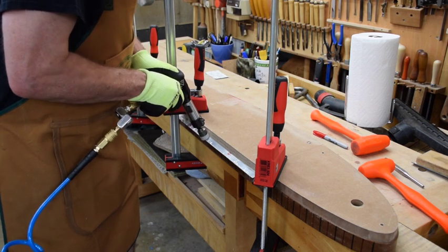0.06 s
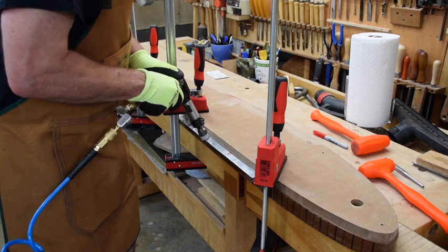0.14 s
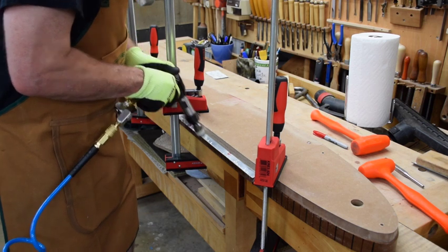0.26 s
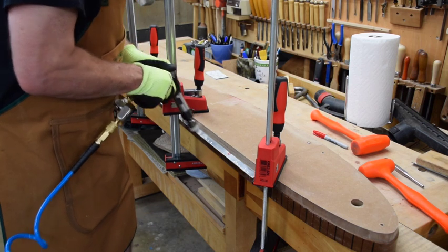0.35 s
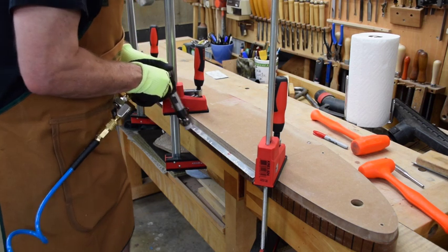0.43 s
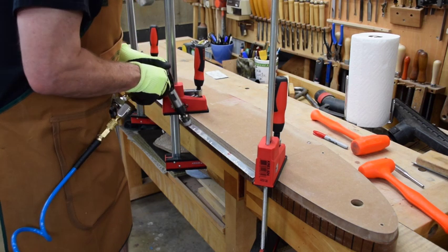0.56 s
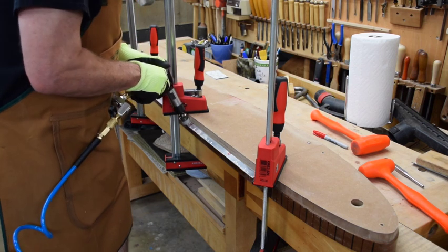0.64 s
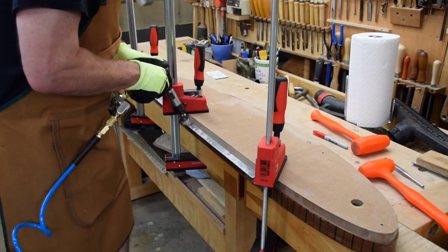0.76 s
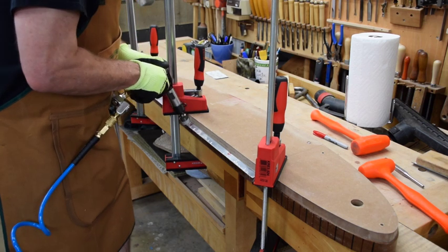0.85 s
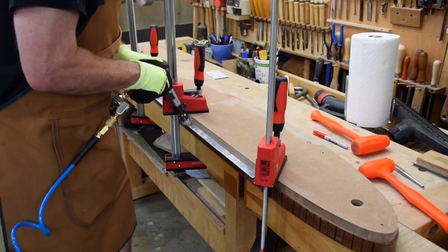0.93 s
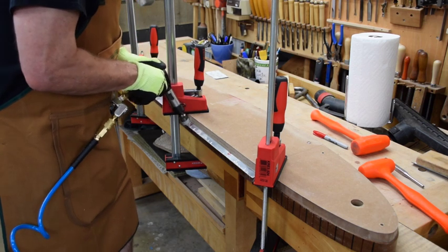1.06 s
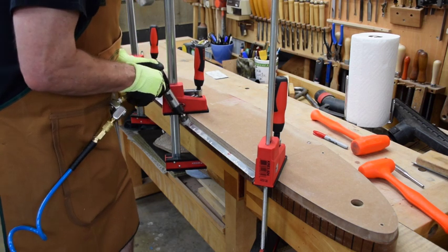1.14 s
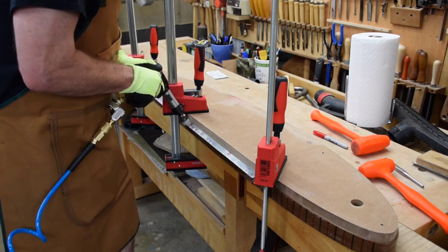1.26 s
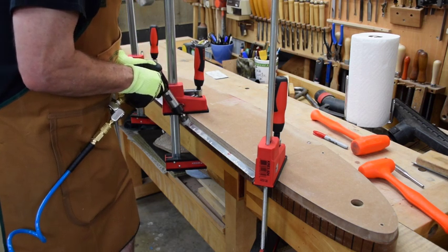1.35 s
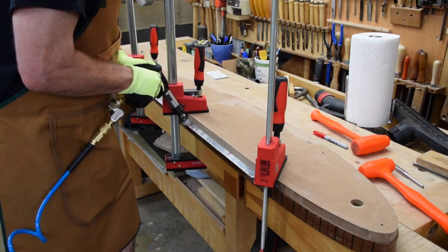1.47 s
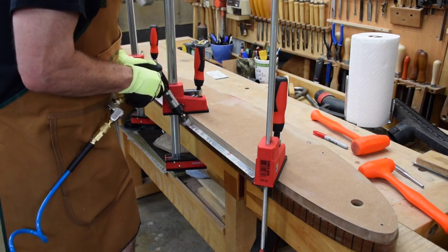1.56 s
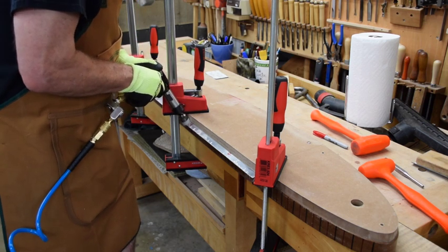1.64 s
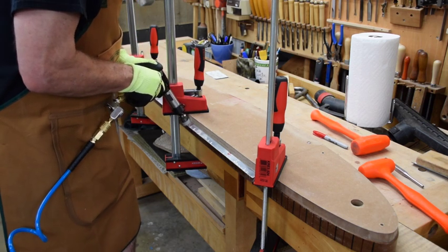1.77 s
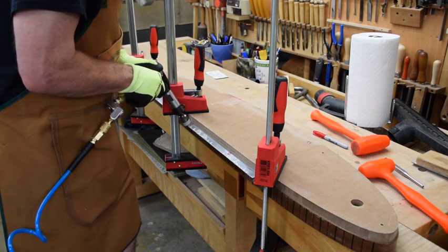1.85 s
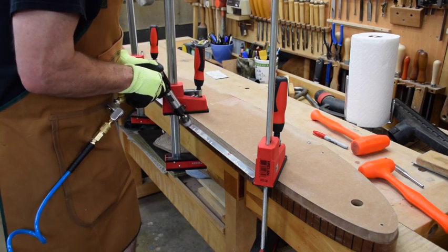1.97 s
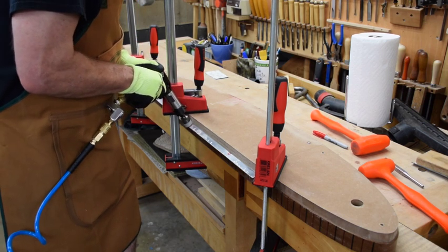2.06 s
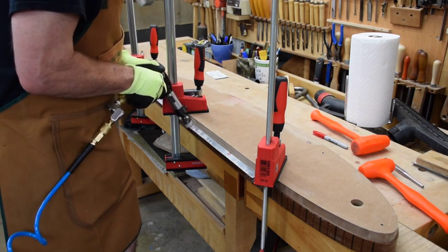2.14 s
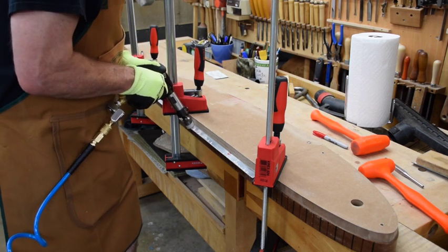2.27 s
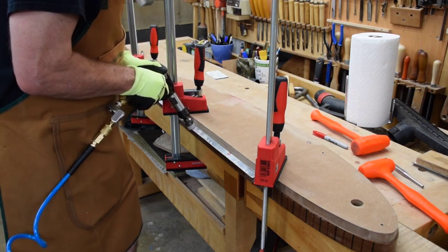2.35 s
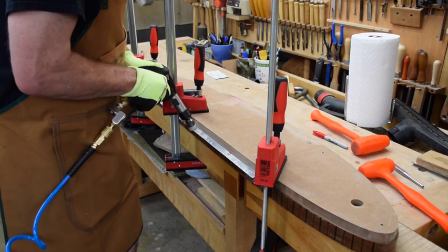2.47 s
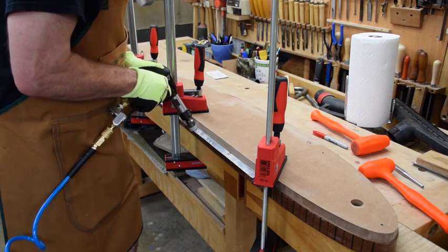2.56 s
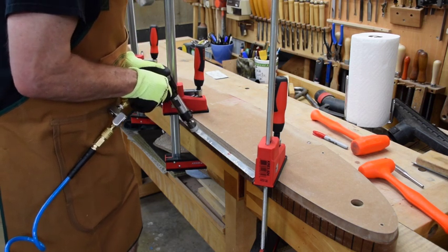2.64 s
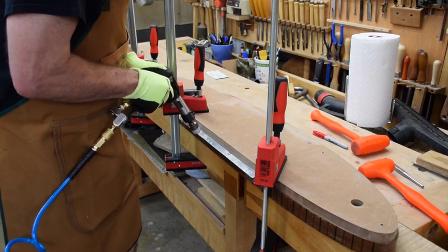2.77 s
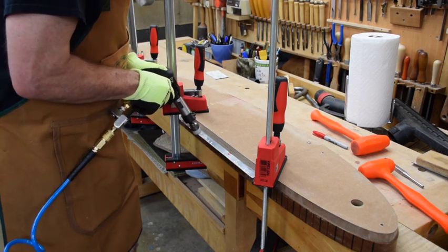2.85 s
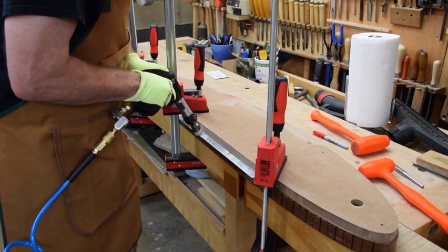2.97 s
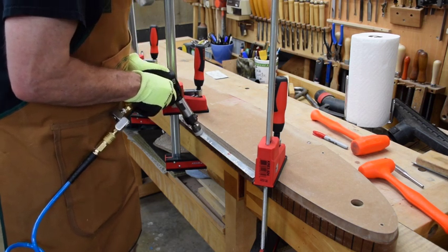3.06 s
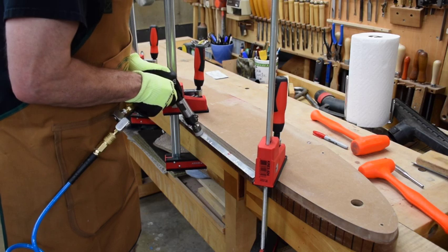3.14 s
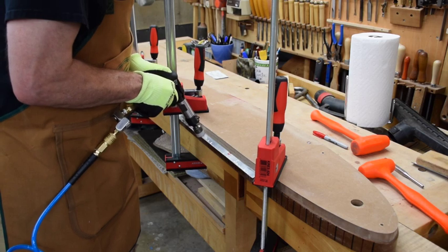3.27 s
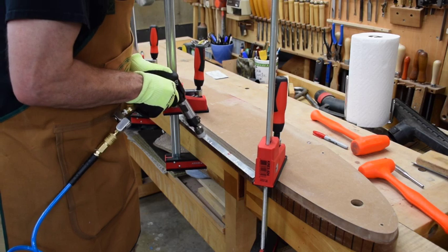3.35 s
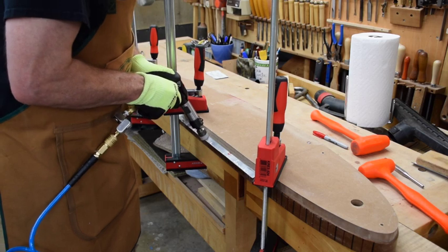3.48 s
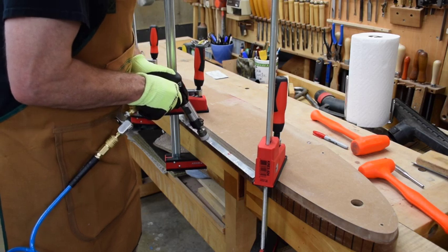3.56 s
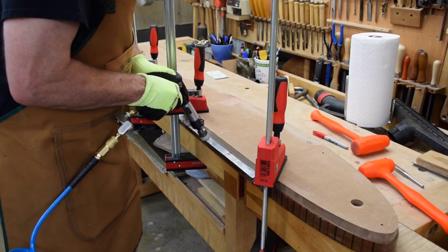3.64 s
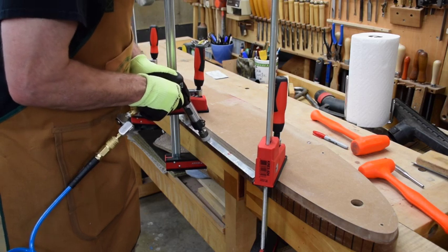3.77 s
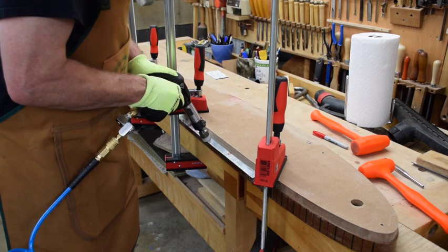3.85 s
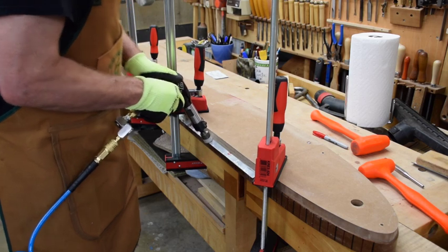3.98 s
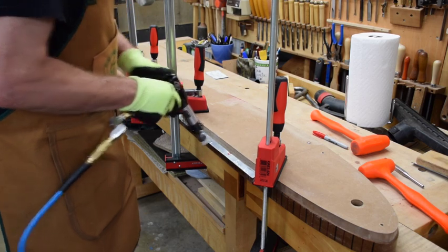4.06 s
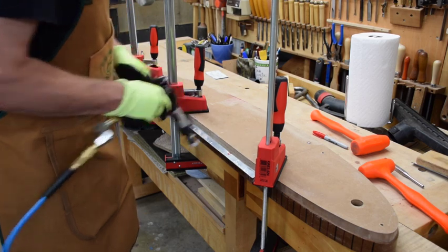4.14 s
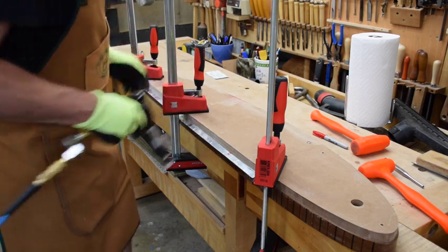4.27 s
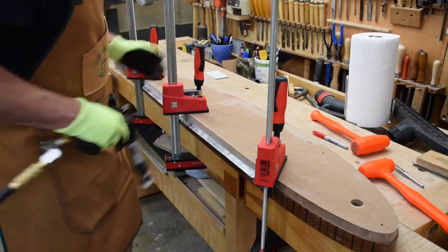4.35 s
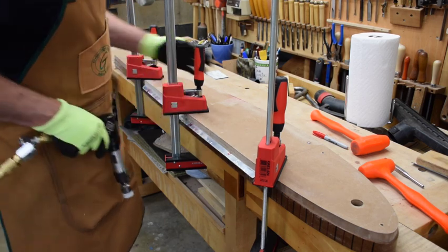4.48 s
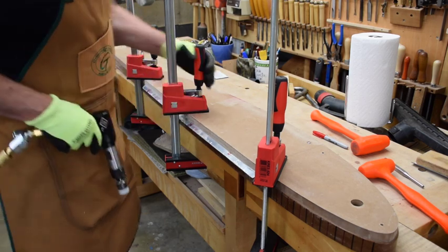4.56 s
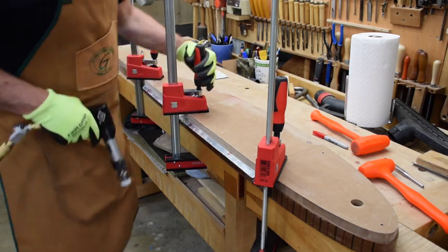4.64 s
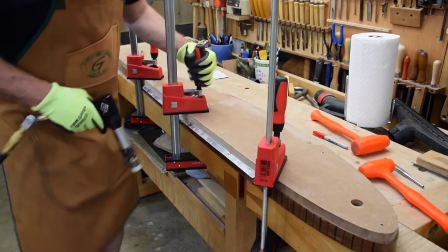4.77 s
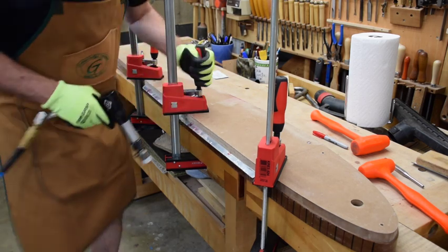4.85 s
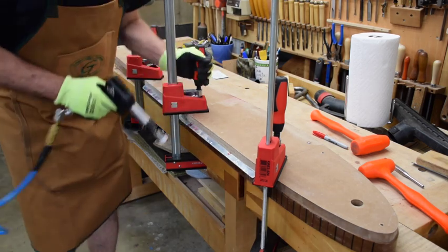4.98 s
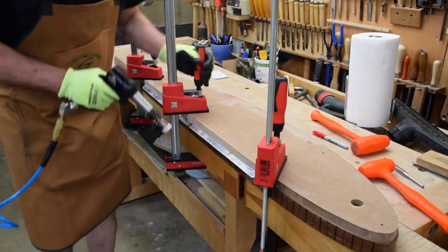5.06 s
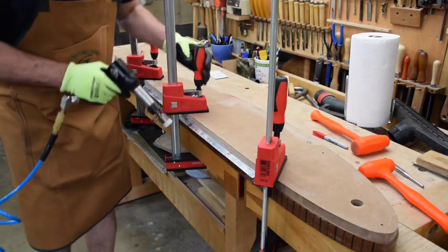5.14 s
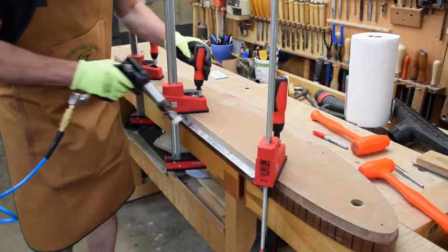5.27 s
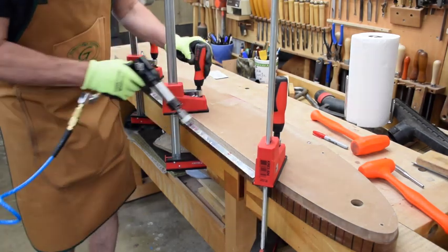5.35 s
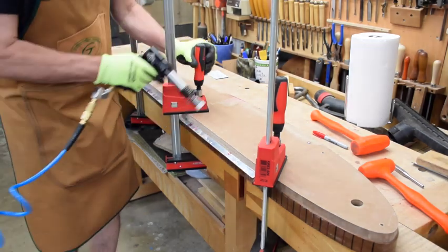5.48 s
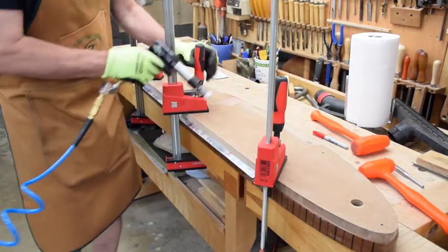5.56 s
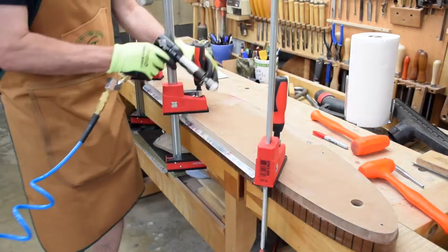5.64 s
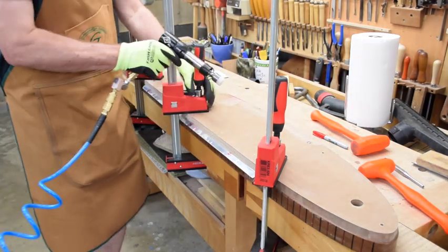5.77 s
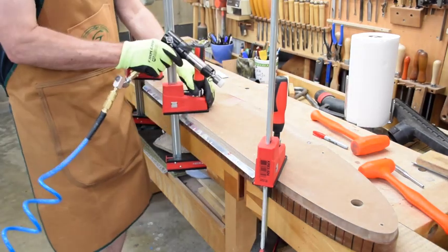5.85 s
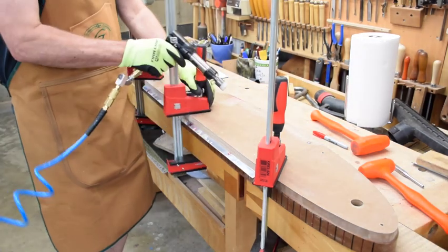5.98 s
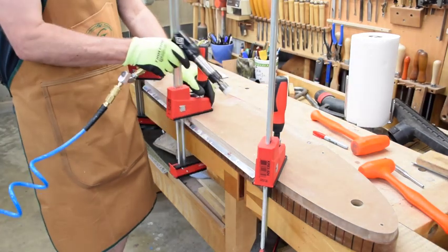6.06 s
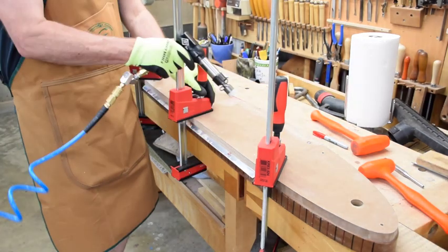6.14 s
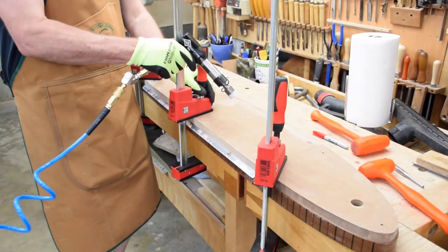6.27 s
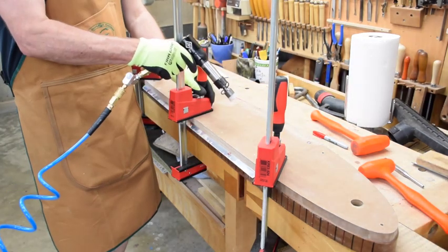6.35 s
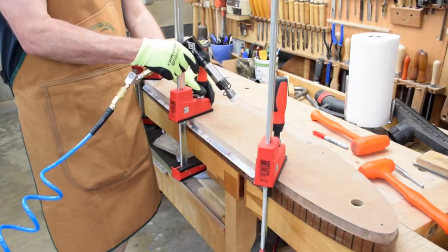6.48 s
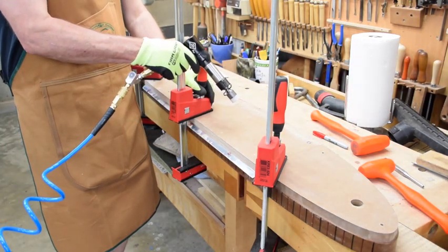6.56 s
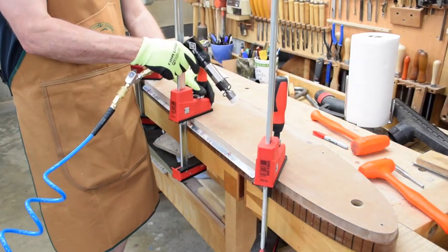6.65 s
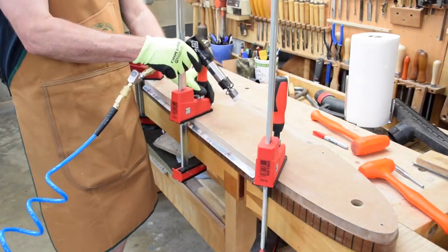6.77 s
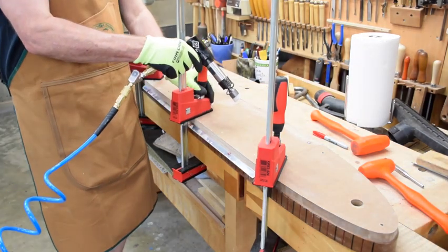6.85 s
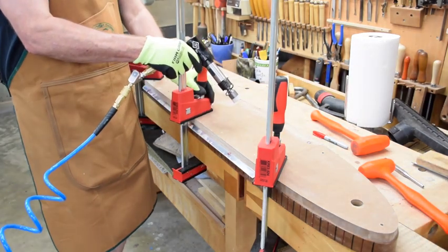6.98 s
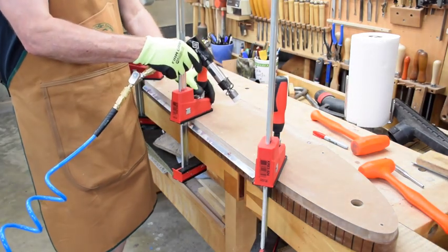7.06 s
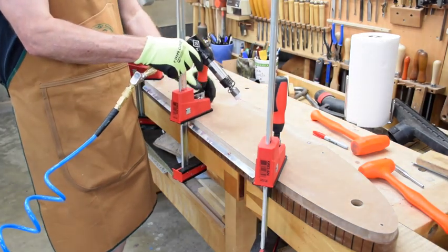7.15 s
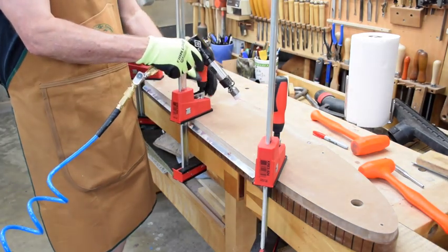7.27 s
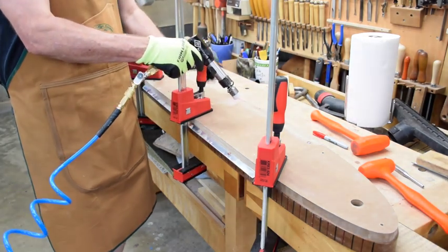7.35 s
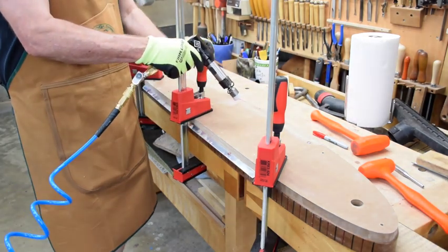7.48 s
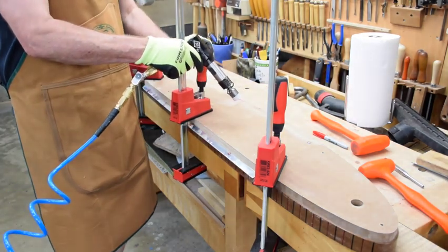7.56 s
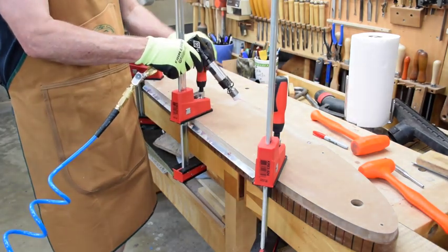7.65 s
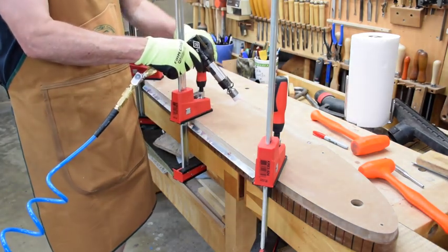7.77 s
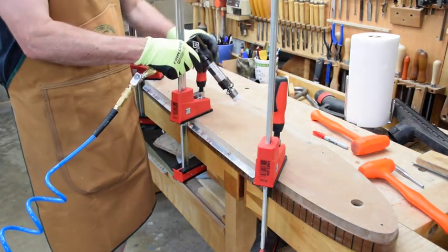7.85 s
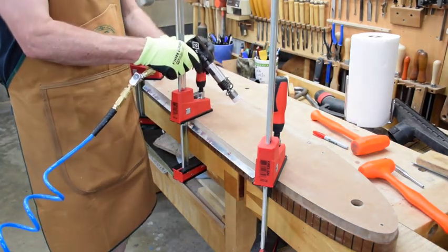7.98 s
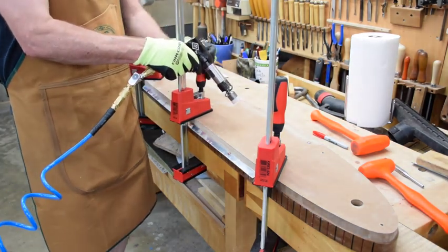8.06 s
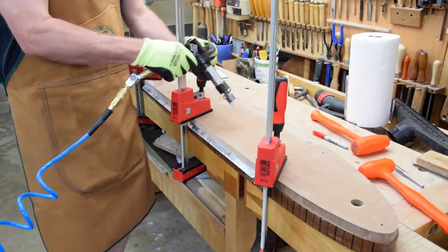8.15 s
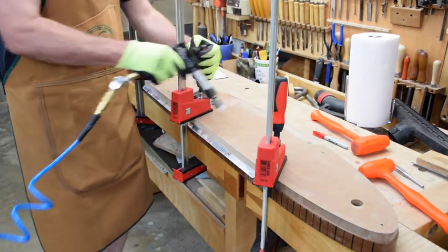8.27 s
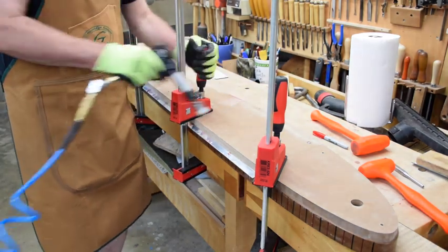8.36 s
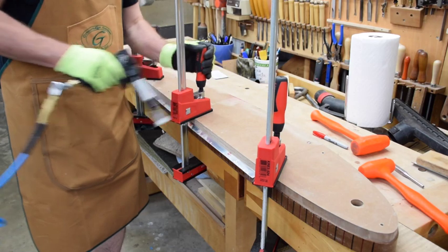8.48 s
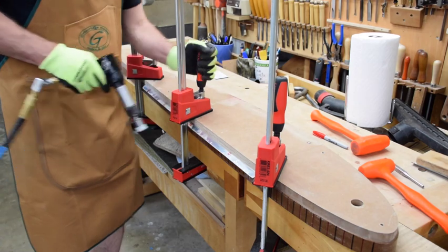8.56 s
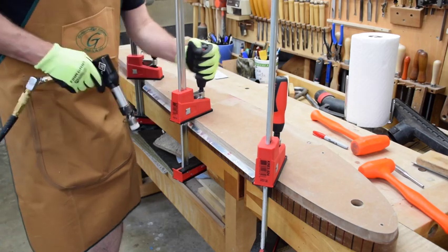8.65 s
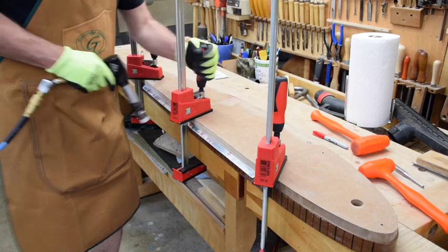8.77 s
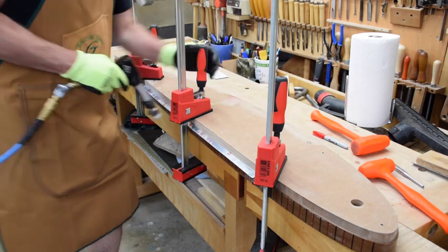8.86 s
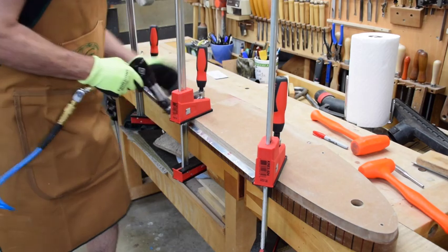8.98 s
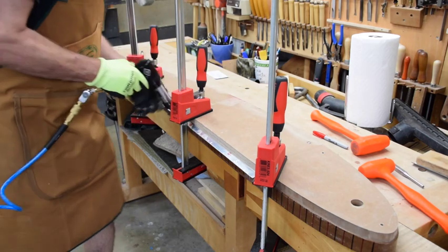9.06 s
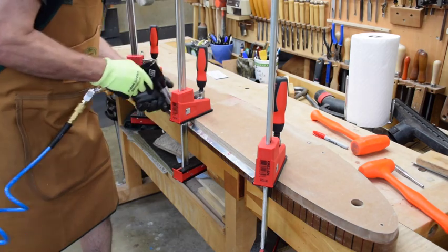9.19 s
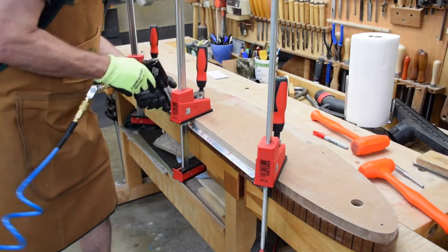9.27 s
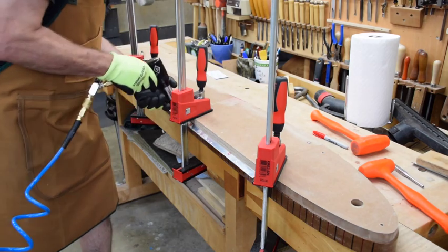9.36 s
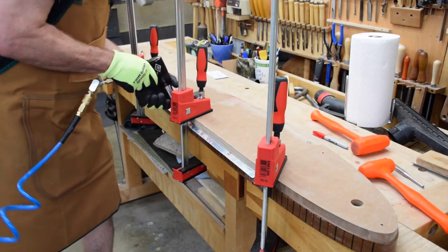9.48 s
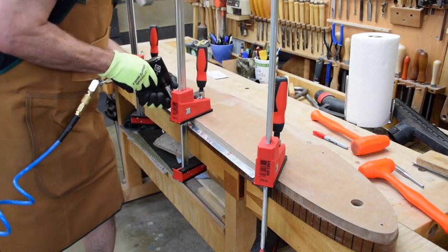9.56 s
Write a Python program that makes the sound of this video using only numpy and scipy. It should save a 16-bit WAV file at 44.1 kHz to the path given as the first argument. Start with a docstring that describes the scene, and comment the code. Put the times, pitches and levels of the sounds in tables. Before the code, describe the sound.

Rapid, very loud air-hammer blows ring an aluminium strip on a wooden form, hiss and stop; clamps then knock and gloves rub quietly.

```python
"""An air hammer beats an aluminium strip over a wooden form clamped to a workbench, about 28 blows a second.
One burst ends and a long, very loud one follows. Each blow rings strip, tool and bench, and puffs out air.
Around the bursts, clamps and tool knock and clink, and gloves, apron and hose rub: shaped clicks and noise.
All of it sounds in a small, live workshop made of echoes and a short tail, over a quiet ventilation hum."""
import sys
import numpy as np
from scipy import signal
from scipy.fft import rfft, irfft
from scipy.io import wavfile
from scipy.ndimage import uniform_filter1d

SR = 44100
rng = np.random.default_rng(int(sys.argv[2]) if len(sys.argv) > 2 else 0)


def store_wav(level_fs):
    """Save 16-bit WAV to argv[1]."""
    pcm = np.round(np.clip(np.atleast_2d(level_fs), -1, 1) * 32767)
    wavfile.write(sys.argv[1], SR, pcm.T.astype(np.int16))


N = 424237
SIZE = 32768  # length of every impulse response, in samples
HZ = np.fft.rfftfreq(SIZE, 1 / SR)  # pitch of each spectrum bin
AGE = np.arange(SIZE) / SR  # seconds since a sound began
TIME = np.arange(N) / SR  # seconds since the scene began


def amp(db):
    """Turns decibels into a gain."""
    return 10 ** (np.asarray(db) / 20)


def unit(x):
    """Scales a sound so that its squares sum to 1."""
    return x / np.sqrt(np.sum(x ** 2) + 1e-20)


def read(points, hz=HZ):
    """Reads a spectrum table, with straight lines between its points on a log-frequency axis."""
    f, value = np.transpose(points)
    return np.interp(np.log(hz + 1), np.log(f), value)


def follow(rows, t):
    """Reads each column of a time table at the times t, with straight lines between its rows."""
    s, *columns = np.transpose(rows)
    return [np.interp(t, s, column) for column in columns]


def fade(t60):
    """An exponential decay that falls by 60 dB in t60 seconds."""
    return np.exp(-np.minimum(np.log(1000) * AGE / t60, 20))


def ring(hz, t60):
    """A decaying sine: one struck resonance."""
    return unit(np.sin(2 * np.pi * hz * AGE) * fade(t60))


def bump(hz, width_hz):
    """The bell shape of one resonance in a spectrum."""
    return 1 / (1 + (2 * (HZ - hz) / width_hz) ** 2)


def causal(db):
    """Makes the promptest (minimum-phase) impulse response that has this spectrum."""
    cepstrum = irfft(np.log(amp(np.maximum(db, db.max() - 100))))
    # Folding the second half onto the first leaves nothing before time zero.
    cepstrum[1:SIZE // 2] *= 2
    cepstrum[SIZE // 2 + 1:] = 0
    return irfft(np.exp(rfft(cepstrum)))


def through(x, response):
    """Passes x through an impulse response (convolution), cut to the length of x."""
    full = signal.oaconvolve(np.atleast_2d(x), np.atleast_2d(response), axes=1)
    return full[:, :np.shape(x)[-1]].squeeze()


def add(mix, s, sound):
    """Mixes a sound in at time s."""
    part = mix[max(round(s * SR), 0):][:len(sound)]
    part += sound[:len(part)]


def evened(h, size):
    """Keeps a response's smear in time but levels its colour, averaged over size bins."""
    colour_db = 10 * np.log10(uniform_filter1d(abs(rfft(h)) ** 2, size=size))
    return unit(through(h, causal(-colour_db)))


def puffs(train, envelope):
    """Gives the loudness of a puff of this shape after every click of the train."""
    return np.sqrt(abs(through(train ** 2, unit(envelope) ** 2)))


def path(near_db, near_t60, tail_db):
    """Direct sound, echoes off bench and wall, scatter from the clutter, and the room's tail."""
    # Nearby surfaces: delay_s, gain, cutoff_hz (the treble above it is dulled)
    echoes = [(.0043, 0.22, 9000), (.0054, 0.34, 4000), (.0075, 0.3, 6000), (.0094, 0.26, 8020),
              (.012, 0.65, 1300), (0.0158, 0.25, 2000)]
    # How long the room rings: pitch_hz, t60_s
    room = [(150, 0.98), (400, 0.97), (1040, 0.65), (2760, .6), (7280, 0.53), (14000, 0.44)]
    early = np.zeros(SIZE)
    early[0] = 1
    for s, gain, cut_hz in echoes:
        smear = fade(np.log(1000) / (2 * np.pi * cut_hz))
        add(early, s, gain * smear / smear.sum())
    scatter = unit(rng.standard_normal(SIZE) * fade(near_t60) * (AGE > .004))
    # The tail is noise in which each pitch dies away at its own rate.
    hz, t, z = signal.stft(rng.standard_normal(SIZE) * (AGE > .012), SR, nperseg=256)
    decay = np.exp(-np.log(1000) * t / read(room, hz)[:, None])
    tail = signal.istft(z * decay, SR, nperseg=256)[1][:SIZE]
    return evened(early + amp(near_db) * scatter + amp(tail_db) * unit(tail), size=31)


def shop(near_db, near_t60, tail_db, width_db):
    """Left and right responses: most alike around 1 kHz, wider in the bass and widest in the treble."""
    # Side (left-right difference) against mid, before width_db is added: pitch_hz, level_db
    width = [(100, -14.5), (700, -23), (1300, -32), (2400, -22.5), (4400, -16), (8100, -9.5), (15000, 1.5)]
    mid = path(near_db, near_t60, tail_db)
    side = path(near_db + 23.0, near_t60, tail_db + 15.0)
    side = through(side, causal(read(width) + width_db))
    return np.array([mid + side, mid - side])


def background():
    """Steady shop ventilation, made of coloured noise, with a few faint wavering tones."""
    # Colour of the ventilation: pitch_hz, level_db (relative)
    hum = [(18, -48), (30, -29), (64, -15.5), (190, -12.5), (211, -11), (288, -9), (415, -8.5), (448, -7.5),
           (815, -5), (928, -6.5), (1000, -7), (2560, -13), (2990, -17.5), (3410, -19), (15000, -36.5)]
    # Side against mid: pitch_hz, level_db
    hum_width = [(60, -15.5), (180, -13.5), (550, -11.5), (1650, -8.5), (3500, -2.5), (15000, -2)]
    # Faint tones: pitch_hz, level_db (rms)
    hum_lines = [(414.5, -71.5), (710.6, -71.5), (947.5, -68), (1066, -68.5)]
    hum_db = -55  # rms of the mid noise
    mid, side = through(rng.standard_normal((2, N)), unit(causal(read(hum))))
    side = through(side, causal(read(hum_width)))
    air = amp(hum_db) * np.array([mid + side, mid - side])
    for hz, db in hum_lines:
        waver_hz = 200 * uniform_filter1d(rng.standard_normal(N), size=4000)  # averages to a few Hz
        air += amp(db) * np.sqrt(2) * np.sin(2 * np.pi * np.cumsum(hz + waver_hz) / SR)
    return air


def rubs(grain=1.0):
    """Gloves, hose and clamp bars slide: many tiny random slips under the swell of each stroke."""
    # Strokes: start_s, length_s, level_db (before the room), centre_hz, width_octaves
    strokes = [(4.332, 0.067, -54, 1500, 1.1), (4.454, 0.083, -42.5, 1390, 1.17),
               (4.555, 0.088, -59.5, 8870, 2.5), (4.827, 0.12, -41, 1084, 1.03),
               (4.908, 0.14, -31, 1210, 1.02), (4.92, 0.35, -64, 6000, 1.1),
               (5.437, 0.057, -48, 2020, 0.43), (5.499, 0.058, -46, 354, 0.63),
               (5.957, 0.22, -49, 780, 1.4), (6.04, 0.11, -63.5, 7960, 0.85), (6.29, 0.14, -57, 354, 0.6),
               (8.66, 0.064, -43, 1000, 0.41), (8.751, 0.34, -62, 5060, 1.9), (8.801, 0.25, -54, 970, 1.15),
               (9.585, 0.045, -50.5, 1960, .05)]
    out = np.zeros(N)
    softness_db = read([(80, -20), (250, 7.5), (10500, -2.0), (15500, -15)])
    for s, length, db, hz, octaves in strokes:
        slips = rng.standard_normal(SIZE) * np.exp(grain * rng.standard_normal(SIZE))
        away = np.log2((HZ + 1) / hz) / octaves
        colour = causal(softness_db - 20 * np.log10(1 + away ** 2 + away ** 4 / 8))
        n = min(round(length * SR), SIZE)
        stroke = through(slips, colour)[:n] * signal.windows.tukey(n, .7)
        add(out, s, amp(db) * np.sqrt(n) * unit(stroke))
    return out


def clinks(level_db=1, rattle_t60=0.007, low_db=11, low_width_hz=500, high_db=17, high_width_hz=1100):
    """Small steel parts clink: a sharp tick of noise through two short steel resonances."""
    # Clinks: start_s, level_db (before level_db above), lower_ring_hz, upper_ring_hz
    clink_list = [(0.474, -46, 4200, 7300), (0.5916, -36.5, 3120, 7640), (9.257, -42.5, 4400, 7000),
                  (9.3591, -44, 4400, 7550)]
    out = np.zeros(N)
    colour_db = read([(200, -24.5), (1500, 8.5), (2400, 1.5), (8200, -4.0), (11000, -12.5), (15000, -25.0)])
    for s, db, low_hz, high_hz in clink_list:
        rings_db = low_db * bump(low_hz, low_width_hz) + high_db * bump(high_hz, high_width_hz)
        tick = rng.standard_normal(SIZE) * fade(rattle_t60)
        add(out, s, amp(db) * unit(through(tick, causal(colour_db + rings_db))))
    return amp(level_db) * np.sqrt(.04 * SR) * out  # levels count as an average over 40 ms


def knocks(ring_width_hz=70, chatter_db=5, chatter_t60=0.04, count=4):
    """A contact and its chatter ring clamp and wood at a few places: duller if soft, deeper if heavy."""
    # Clamps and tool on wood: start_s, level_db, treble_cutoff_hz, thud_db,
    # lower_ring_hz, lower_ring_db, upper_ring_hz, upper_ring_db
    knock_list = [(0.684, -32.5, 520, -1, 390, 10, 890, 2), (0.814, -42, 790, -18, 824, 11, 1720, 18),
                  (0.861, -40, 1490, -7, 800, -1, 1180, 2), (1.02, -41, 6000, 17, 230, 9, 1400, 0),
                  (4.306, -43, 2980, 1, 696, 8, 1610, 2), (4.34, -40.5, 2880, -3.5, 990, 2, 2000, 7),
                  (4.626, -36, 3150, 15, 160.5, 11, 400, 1.5), (4.799, -37.5, 2430, -6, 885, 5, 2030, 1),
                  (4.917, -30.5, 1780, -12, 380, 4, 890, 9), (4.958, -32.5, 2500, -13, 950, 5, 1700, 5),
                  (5.097, -31, 2870, -1.5, 1010, 4, 1240, 3), (5.312, -50, 3000, 1.5, 900, 4, 2200, 4.5),
                  (5.363, -32.5, 1150, 10.5, 270, 5.5, 477, 8.5),
                  (5.434, -36.5, 4950, -8, 1986, 6.5, 2960, 8), (5.464, -40, 5000, 11.5, 479, 5.5, 1800, 2),
                  (5.515, -42, 2870, 14, 300, 5, 480, 8), (5.705, -29.5, 2400, -15, 950, 4.5, 1900, 9),
                  (5.733, -20, 3500, 3.5, 944, 11.5, 2250, 2.5), (5.92, -43.5, 1650, 1, 915, 6, 1405, 3.5),
                  (6.089, -37.5, 1800, -4.5, 940, 10.5, 2350, 7.5),
                  (6.194, -52, 4000, -3, 950, 4.5, 2000, 4.5), (6.474, -37, 697, -18, 813, 12, 1726, 15),
                  (6.555, -51, 3000, -7.5, 830, 9, 3750, 12.5),
                  (6.699, -54.5, 2500, -8, 800, 6.5, 1800, 6.5), (6.742, -41, 595, 2.5, 300, 8, 734, 7),
                  (6.806, -26.5, 1100, -14, 830, 4, 1750, 7), (7.107, -37.5, 550, -2, 300, 14, 734, 13),
                  (7.844, -28.5, 950, -19.5, 823, 5, 1590, 7.5),
                  (7.983, -28.5, 2180, 20, 269, 9.5, 2310, 1),
                  (7.991, -33.5, 1640, 20, 262, 11.5, 607, 5.5), (8.045, -43.5, 2000, 13, 280, 5, 432, 6),
                  (8.124, -39, 500, 1, 528, 10, 900, 9), (8.237, -22, 1900, 1.5, 510, 6, 2380, 8),
                  (8.58, -33.5, 2600, 11.5, 264, 7.5, 563, 8), (8.616, -45.5, 4980, 3, 698, 7, 1600, 2.5),
                  (8.685, -38.5, 500, -11.5, 694, 8.5, 1160, 6), (8.763, -40.5, 2400, 11, 800, 0, 1684, 10),
                  (9.185, -36, 2200, -3.5, 925, 4, 2130, 2.5), (9.244, -26.5, 3040, 1, 420, 14, 936, 12.5),
                  (9.564, -43.5, 4100, 8, 398, 10, 3720, 8.5)]
    # Colour shared by all knocks: pitch_hz, level_db (relative)
    wood = [(40, -40), (100, -29), (160, -17.5), (250, -8.5), (400, -4.5), (630, 1), (1000, 0),
            (1600, 0.04), (2500, -1.5), (4000, -5.5), (6300, -12.5), (10000, -14), (16000, -31)]
    # Resonances of clamp and form shared by all knocks: pitch_hz, width_hz, level_db
    clamp = [(484.4, 60, 2), (630, 90, -2), (830, 50, 5), (945, 44, 2.5), (1150, 70, 3), (1430, 80, 1.5),
             (2130, 110, 4), (2900, 300, -0.5), (3550, 150, 0), (4500, 400, 1.5), (7700, 900, 3.5)]
    soft_db_per_octave = 10.5  # treble lost above the cut-off
    thud_hz, thud_octaves = 895, 1.7  # the thud grows below this pitch, and is full this far down
    places = np.zeros((count, N))
    bass = np.clip(np.log2(thud_hz / (HZ + 1)) / thud_octaves, 0, 1)
    shared_db = read(wood) + sum(db * bump(hz, width) for hz, width, db in clamp)
    for k, (s, db, cut_hz, thud_db, low_hz, low_db, high_hz, high_db) in enumerate(knock_list):
        octaves_over = np.log2(1 + (HZ / cut_hz) ** 3) / 3
        high_width_hz = ring_width_hz * np.sqrt(high_hz / low_hz)
        rings_db = low_db * bump(low_hz, ring_width_hz) + high_db * bump(high_hz, high_width_hz)
        body = unit(causal(shared_db - soft_db_per_octave * octaves_over + thud_db * bass + rings_db))
        # The fifth power turns noise into sparse spikes; a single click leads them.
        contact = amp(chatter_db) * unit(rng.standard_normal(SIZE) ** 5 * fade(chatter_t60))
        contact[0] += 1
        add(places[k % count], s, amp(db) * unit(through(evened(contact, size=111), body)))
    out = sum(through(place, shop(near_db=5, near_t60=0.16, tail_db=-8.5, width_db=-2.5)) for place in places)
    return np.sqrt(0.029 * SR) * out  # levels count as an average over 29 ms


def blows():
    """One blow per piston cycle, strongest with a full hose: click trains for strike, exhaust and push."""
    # Piston speed once running, drifting with the load: time_s, blows_per_s
    speed_curve = [(1.14, 28.21), (1.65, 28.02), (2.0, 28.53), (2.35, 28.41), (2.53, 28.15), (2.7, 28.37),
                   (2.98, 28.28), (3.14, 27.92), (3.3, 28.58), (3.42, 29.1), (3.52, 28.4), (3.78, 28.3),
                   (3.93, 28.0)]
    # Single blows as the trigger valve opens or closes: start_s, blow_db, exhaust_db, low_push_db (relative)
    stray = [(0.0, -16, -23.5, -53), (0.036, -14.5, -21, -27), (0.0895, -21, -24, -53),
             (1.115, -28.5, -41.5, -72), (1.127, -25, -34, -62.5), (3.945, -19, -23, -47.5)]
    # How hard the hand leans on the tool: time_s, added_blow_db
    lean = [(1.5, -1.5), (2.15, -1), (2.45, -1), (2.78, -1.4), (2.98, 1.5), (3.2, -1.7), (3.4, 0.8),
            (3.52, -0.9), (3.74, 0.5), (3.91, -0.5)]
    # Steady levels (relative): blow_db, exhaust_db, low_push_db
    steady_db = [-12.5, -13, -47]
    # Random spread from blow to blow: blow_db, exhaust_db, low_push_db
    scatter_db = [.5, 0.8, 1.5]
    # Extra strength from air stored in the hose: blow_db, exhaust_db, low_push_db
    surge_db = [8.5, 8, 4.5]
    surge_s = 0.24  # how fast the stored air is spent
    pull_s, release_s = 1.1425, 3.925  # the trigger is held for the long burst
    spin_up_hz, spin_up_s = 5.17, 0.03  # the piston starts this much slower (blows per s), then catches up
    jitter_s = .00006
    sag_db_per_s = 3  # the exhaust weakens as the supply pressure sags
    kick_s, kick_db = 2.74, -20  # once the tool kicks and thumps the bench: time and low push
    t = np.arange(pull_s, release_s, 1 / SR)
    speed = follow(speed_curve, t)[0] - spin_up_hz * np.exp(-(t - pull_s) / spin_up_s)
    # A blow falls each time the running count of cycles passes a whole number.
    cycle = np.floor(np.cumsum(speed) / SR)
    s = t[np.diff(cycle, prepend=-1) > 0]
    s = s + jitter_s * rng.standard_normal(len(s))
    held = s - pull_s
    levels_db = steady_db + np.outer(np.exp(-held / surge_s), surge_db)
    levels_db += scatter_db * rng.standard_normal((len(s), 3))
    levels_db[:, 0] += follow(lean, s)[0]
    levels_db[:, 1] -= sag_db_per_s * held
    levels_db[np.argmin(abs(s - kick_s)), 2] = kick_db
    rows = np.vstack([np.column_stack([s, levels_db]), stray])
    at = np.maximum(np.round(rows[:, 0] * SR).astype(int), 0)
    trains = np.zeros((3, N))
    trains[:, at] = amp(rows[:, 1:].T) * np.sqrt(SR / speed.mean())
    return trains


def thump(strike, push, push_db=-2, jolt_db=-14, jolt_t60=0.021):
    """Air is shoved out and sucked back; each blow adds a dull low jolt, opposite in sign left and right."""
    # Colour of the dull low jolt, opposite in sign left and right: pitch_hz, level_db (relative)
    jolt_colour = [(25, -11.5), (60, -4), (130, -2), (210, -1.5), (400, 2), (700, 2), (1500, -8.5),
                   (4000, -18), (9000, -33.5)]
    # Level of the left-right jolt over the burst: time_s, level_db (relative)
    jolt_level = [(.1, -6.5), (1.15, -1), (2.5, 1), (2.85, -8.5), (3.9, -11)]
    u = AGE / 0.0023
    uneven = rng.uniform(.5, 1.5, (2, N))  # each push differs in strength from left to right
    shove = through(push * uneven, unit((1 - u) * np.exp(-u)))
    smear = evened(rng.standard_normal(SIZE) * fade(jolt_t60), size=61)
    jolt_response = unit(through(smear, causal(read(jolt_colour))))
    jolt = through(strike * amp(follow(jolt_level, TIME)[0]), jolt_response)
    return amp(push_db) * shove + amp(jolt_db) * np.array([jolt, -jolt])


def exhaust(train, level_db=-1.5, spit_t60=0.032, vent_s=.0043, vent_db=-4, vent_t60=0.04,
            whistle_width_hz=450, whistle_scatter=.02):
    """Air spits at the impact, then the port opens and vents; each puff whistles at its own pitch."""
    # Colour of the hiss: pitch_hz, level_db (relative)
    hiss_colour = [(300, -8.5), (1500, 8), (3000, -0.5), (5500, -8), (7000, 1), (9700, -1), (11500, -2.5),
                   (13500, -9.5), (15500, -15.5)]
    # Exhaust level as the grip shifts: time_s, level_db (relative)
    flow = [(1.5, -1.5), (2.15, 1), (2.4, -2.5), (2.6, -1), (2.69, 1.5), (2.78, -1), (3.0, 0), (3.12, -2.5),
            (3.33, -2), (3.4, 2.5), (3.5, -4), (3.82, -1.5), (3.91, 3.5)]
    # Air leaking through the half-open valve: time_s, level_db (before the room)
    leak = [(1.015, -80.5), (1.024, -37.5), (1.045, -47.5), (1.07, -41.5), (1.12, -36), (1.14, -29.5),
            (1.15, -89.5)]
    # Whistle of the port, gliding between pitches: time_s, pitch_hz, level_db (against the hiss)
    whistle_curve = [(1.03, 7060, -7), (1.07, 8000, 0.5), (1.11, 9500, -4), (1.16, 8270, -12.5),
                     (1.35, 9600, -13.5), (2.15, 9680, -10), (2.25, 11130, -10.5), (2.58, 11340, -10),
                     (2.68, 9550, -10), (2.85, 7490, -8), (3.4, 7300, -8.5), (3.55, 6793, -10),
                     (3.9, 7430, -9)]
    puff = fade(spit_t60) + amp(vent_db) * np.roll(fade(vent_t60), round(vent_s * SR))
    air = amp(level_db + follow(flow, TIME)[0]) * puffs(train, puff) + amp(follow(leak, TIME)[0])
    hiss = through(air * rng.standard_normal(N), unit(causal(read(hiss_colour))))
    hz, db = follow(whistle_curve, TIME)
    hz = hz * (1 + whistle_scatter * rng.standard_normal(N)[np.cumsum(train > 0)])
    # Slow complex noise spreads the whistle into a narrow band around its pitch.
    smoother = unit(AGE * fade(np.log(1000) / np.pi / whistle_width_hz))
    flutter = through(rng.standard_normal(N) + 1j * rng.standard_normal(N), smoother)
    whistle = air * amp(db) * (flutter * np.exp(2j * np.pi * np.cumsum(hz) / SR)).real
    return through(hiss + whistle, shop(near_db=-5.0, near_t60=0.11, tail_db=-13.0, width_db=-2))


def rattle(strike, level_db=-17, shaken_t60=.2):
    """The loose tool rattles in its retainer: small steel ticks at random moments while it is shaken."""
    # Colour of the ticks: pitch_hz, level_db (relative)
    tick_colour = [(800, -19), (2200, -1), (4200, -0.5), (6500, -5), (14000, -20)]
    ticks_per_s = 130
    ticks = (rng.random(N) < ticks_per_s / SR) * rng.standard_normal(N) * np.sqrt(SR / ticks_per_s)
    room = shop(near_db=2.5, near_t60=.06, tail_db=-6.5, width_db=-9.5)
    response = through(room, unit(causal(read(tick_colour))))
    return amp(level_db) * through(ticks * puffs(strike, fade(shaken_t60)), response)


def bent(h):
    """Bending waves carry treble ahead of bass along the strip: a click becomes a quick downward chirp."""
    bend_s = 0.000606  # travel time at 1 kHz
    return irfft(rfft(h) * np.exp(-4j * np.pi * bend_s * np.sqrt(1000 * HZ)))


def rebounds(strike):
    """The tool bounces and lands a second time, more weakly, shortly after every blow."""
    delay_s, spread_s, level_db = 0.00491, 0.00028, -4.5
    at, out = np.flatnonzero(strike), np.zeros(N)
    delay = delay_s + spread_s * rng.standard_normal(len(at))
    out[at + np.round(delay * SR).astype(int)] = amp(level_db) * strike[at]
    return out


def hammer(strike, chatter_db=-13, chatter_t60=0.041, slap_db=-7, slap_hz=720, slap_t60=0.0041,
           steel_db=-8, strip_db=-1):
    """Each blow slaps the strip flat, bounces, and rings strip and bench by where it lands."""
    # Where the hammer sits on the strip: time_s, spot (0 far to 2 near)
    spot_curve = [(0.2, 1.33), (1.1, 0.1), (1.45, 0.3), (1.9, 0.54), (2.55, 1.07), (2.95, 1.73)]
    # Broad colour of a blow: pitch_hz, level_db (relative)
    blow_colour = [(40, -48.5), (130, -17.5), (190, -23), (300, -7.5), (550, -3), (800, 1.5), (1400, 1.5),
                   (2200, -18), (3400, -10.5), (5500, -12.5), (7200, -19), (10000, -10.5), (15500, -32)]
    # Resonances of form and bench: pitch_hz, width_hz, spot_0_db, spot_1_db, spot_2_db
    bench = [(192, 160, 3, 20, 2.5), (431, 71, 2.5, 3, 5), (571.4, 260, 6.5, 11.5, 10),
             (720, 28, -1.5, -2, 6.5), (720.3, 55, 6.5, 8.5, 8), (873, 163, 9, 11.5, 6),
             (1054, 160, 15.5, 6, 0), (1070, 210, -9, -1.5, 7), (1255, 190, 4, 7.5, 5.5),
             (1343, 18, 14, 7.5, -8.5), (1394, 58, 4.5, 4.5, 10), (1543, 83, 4, 10.5, 4.5),
             (1650, 28, -7, -8.5, 17), (1803, 59, -5, -8.5, 13), (1890, 330, 10.5, 19, -3.5),
             (2050, 81, 12, 1.5, 12.5), (2150, 260, 5, 5, 15), (2315, 300, 16.5, 4, 13),
             (2562, 72, 16, -2, 5), (2747, 520, 7.5, 12, 3), (2900, 43, 3, -5, -9.5),
             (3060, 66, 4.5, 11.5, 8.5)]
    # Ring of the steel tool, plus a brief sharp ping near 7.2 kHz at each blow: pitch_hz, level_db (relative),
    # t60_s
    steel_rings = [(4050, -26, 0.77), (4920, -28, 0.57), (6730, -25.5, 0.61), (6950, -26, .35),
                   (7200, -17.5, .0025)]
    # Clear ring of the aluminium strip: pitch_hz, t60_s, spot_0_db, spot_1_db, spot_2_db (relative)
    strip_rings = [(428, .2, -28, -22, -23), (572.5, .2, -27.5, -18, -14.5), (633, .16, -25, -18, -17),
                   (734.3, .2, -20, -24, -10), (804, .18, -28.5, -22.5, -17),
                   (875.6, .2, -10, -14.5, -22.5), (1016, .16, -13.5, -19, -29),
                   (1050, .16, -16.5, -22.5, -16.5), (1250, .14, -20.5, -19, -25),
                   (1325, .2, -16, -17, -25.5), (1384, .14, -25.5, -21.5, -14),
                   (1485, 0.11, -15, -14.5, -26), (2480, .16, -21.5, -28.5, -27.5)]
    # Brief boom of the bench top, most in mid-span: spot_0_db, spot_1_db, spot_2_db
    boom_db = [-27, -21.5, -27]
    spot_skip = 0.15  # random spread of the landing spot, as the tool skips about
    skip = spot_skip * rng.standard_normal(N)[np.cumsum(strike > 0)]
    spot = np.clip(follow(spot_curve, TIME)[0] + skip, 0, 2)
    steel = sum(amp(db) * ring(hz, t60) for hz, db, t60 in steel_rings)
    slap = unit(np.sin(2 * np.pi * slap_hz * AGE) * AGE * fade(slap_t60))
    boom = ring(210, 0.048)
    tones = []
    for hz, t60, *_ in strip_rings:
        tones.append(unit(np.sin(2 * np.pi * (hz * AGE + rng.random())) * fade(t60)))
    contact = strike + amp(chatter_db) * puffs(strike, fade(chatter_t60)) * rng.standard_normal(N)
    out = np.zeros((2, N))
    for k in range(3):
        resonances_db = sum(mode[2 + k] * bump(mode[0], mode[1]) for mode in bench)
        body = unit(causal(read(blow_colour) + resonances_db))
        room = shop(near_db=2.0, near_t60=0.15, tail_db=-4.5, width_db=-11)
        response = through(room, bent(body) + amp(steel_db) * steel)
        strip = amp(strip_db) * sum(amp(mode[2 + k]) * tone for mode, tone in zip(strip_rings, tones))
        share = np.sqrt(np.maximum(1 - abs(spot - k), 0))  # a blow between two spots excites both
        out -= through(contact * share, response + strip + amp(boom_db[k]) * boom)
    return out - amp(slap_db) * through(strike + rebounds(strike), bent(slap))


def scene():
    """The hammer, the handling of the clamps and the quiet shop."""
    strike, air, push = blows()
    tool = hammer(strike) + rattle(strike) + exhaust(air) + thump(strike, push)
    handling = knocks() + through(rubs(), shop(near_db=5.0, near_t60=0.17, tail_db=-4.5, width_db=-3.0))
    steel = through(clinks(), shop(near_db=2.5, near_t60=0.11, tail_db=-14, width_db=-4.5))
    balance = amp([[-.3], [.3]])  # the right side is slightly louder
    return (tool + handling + steel + background()) * balance


def record(dry):
    """Peaks beyond full scale are flattened; then a low-pass filter removes the highest treble."""
    edge_hz = 15750
    clipped = np.clip(dry, -1, 1)
    low_pass = signal.firwin(511, edge_hz, window=("kaiser", 9), fs=SR)
    return signal.oaconvolve(clipped, low_pass[None], "same")


dry = scene()
out = record(dry)
store_wav(out)
```